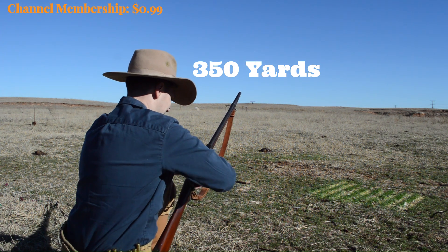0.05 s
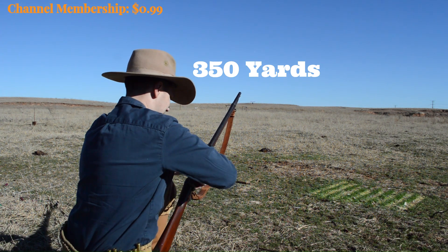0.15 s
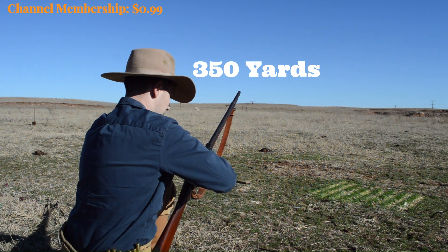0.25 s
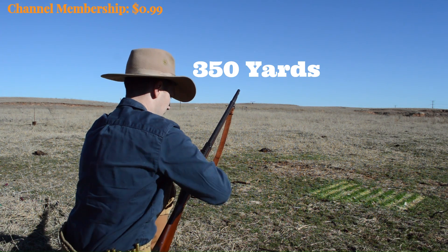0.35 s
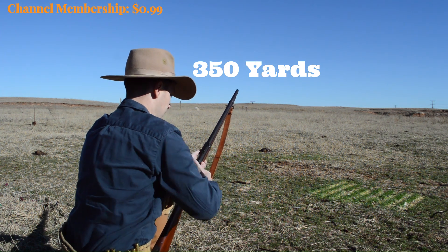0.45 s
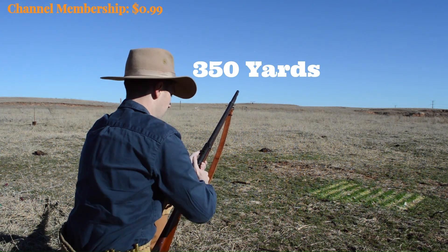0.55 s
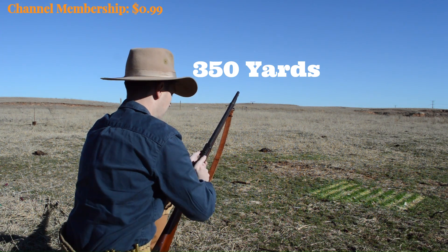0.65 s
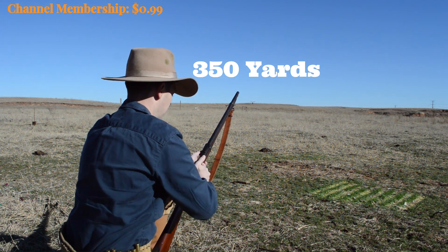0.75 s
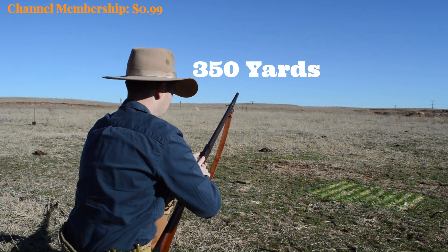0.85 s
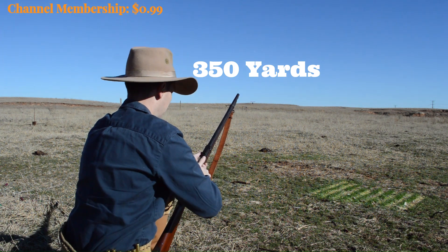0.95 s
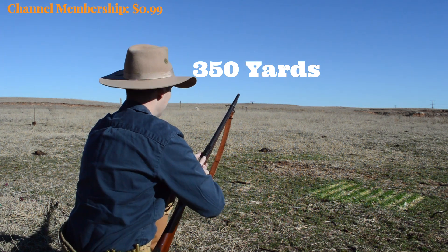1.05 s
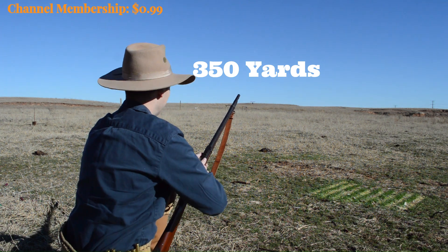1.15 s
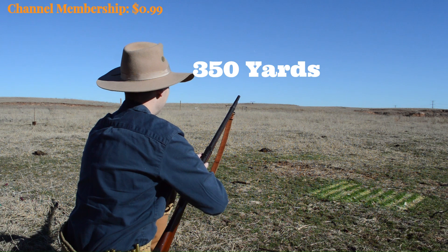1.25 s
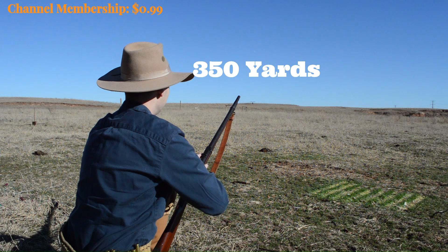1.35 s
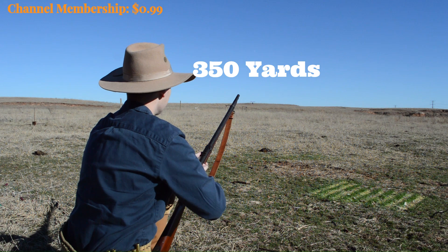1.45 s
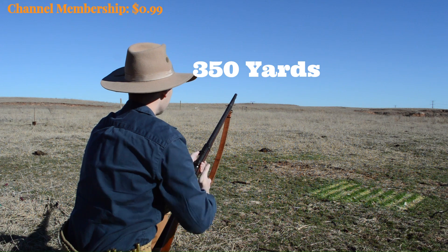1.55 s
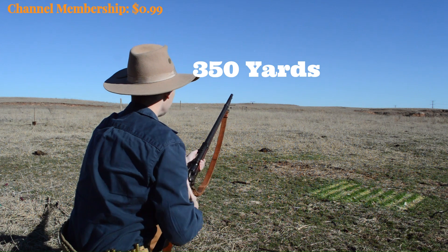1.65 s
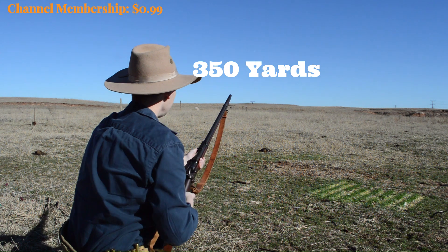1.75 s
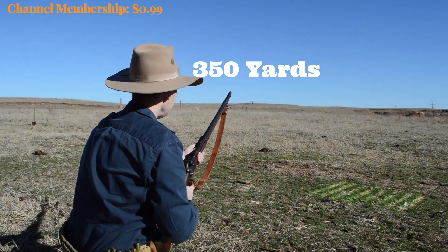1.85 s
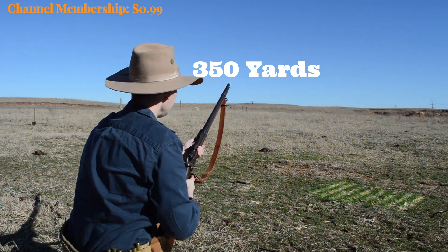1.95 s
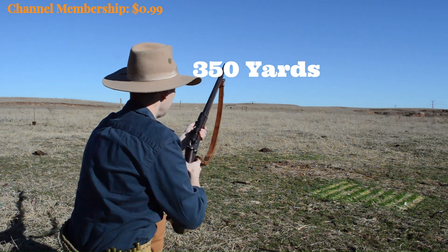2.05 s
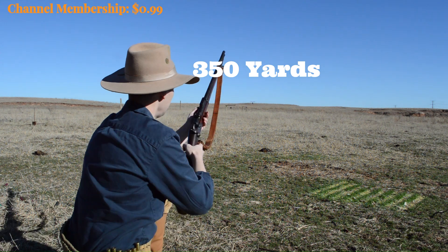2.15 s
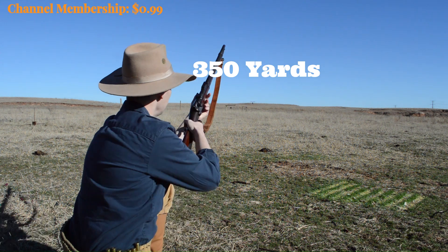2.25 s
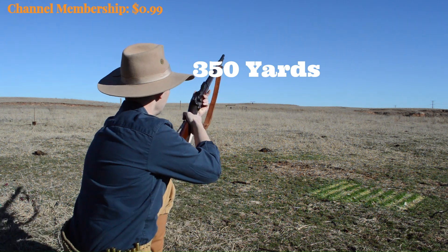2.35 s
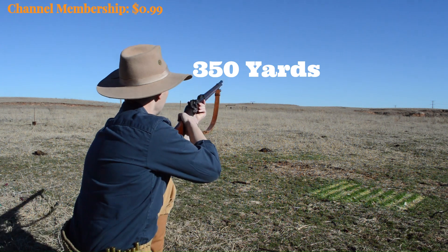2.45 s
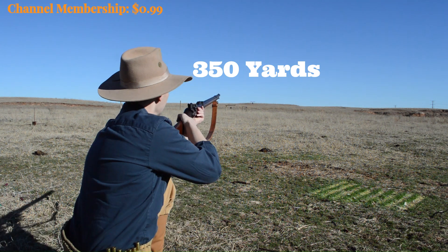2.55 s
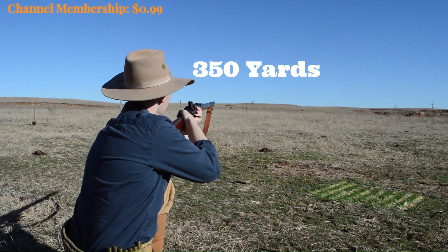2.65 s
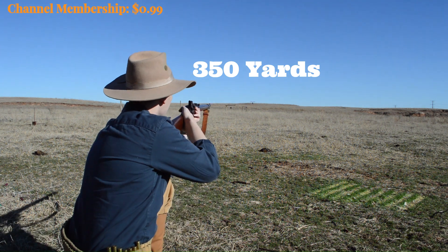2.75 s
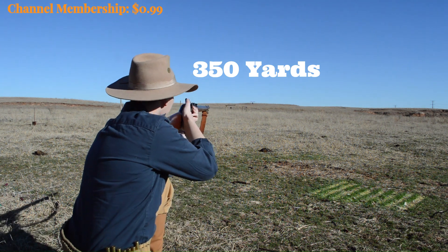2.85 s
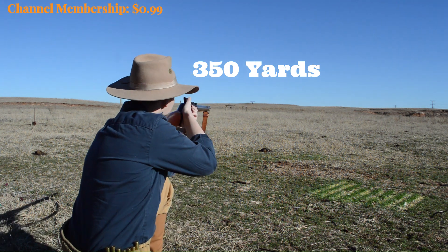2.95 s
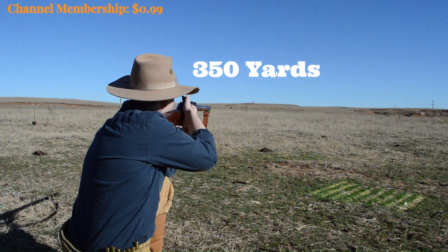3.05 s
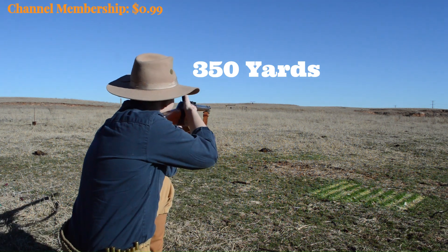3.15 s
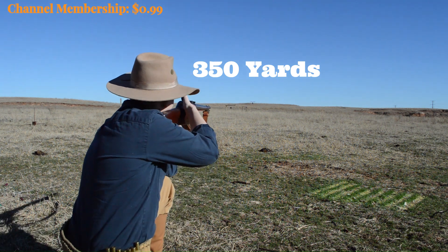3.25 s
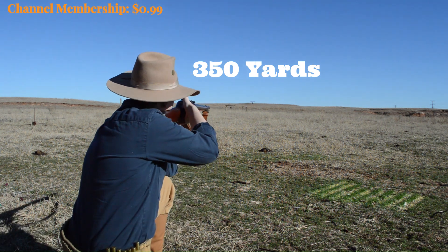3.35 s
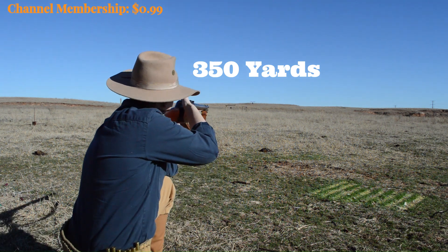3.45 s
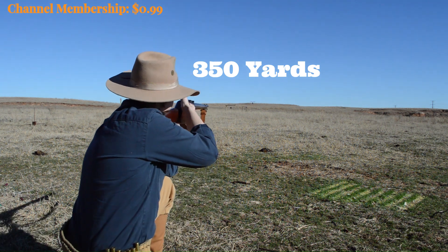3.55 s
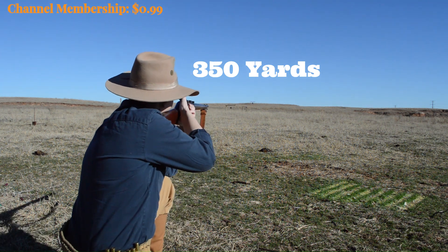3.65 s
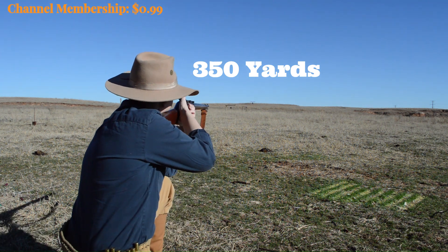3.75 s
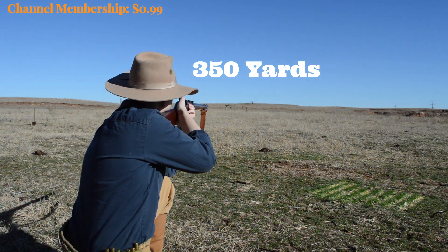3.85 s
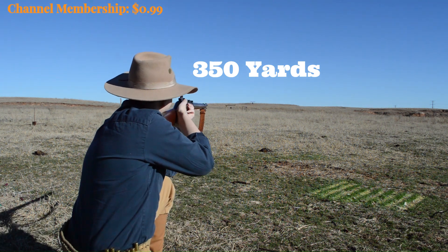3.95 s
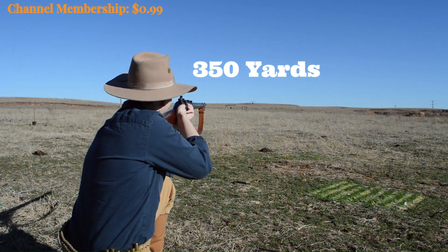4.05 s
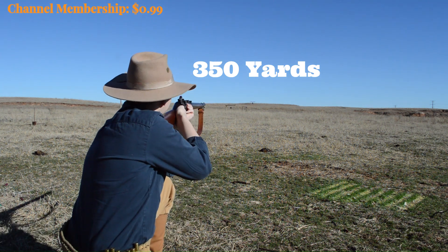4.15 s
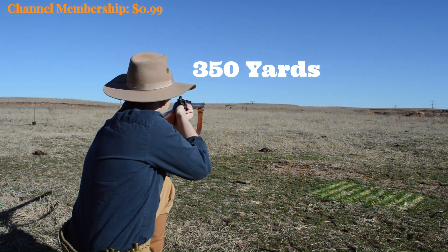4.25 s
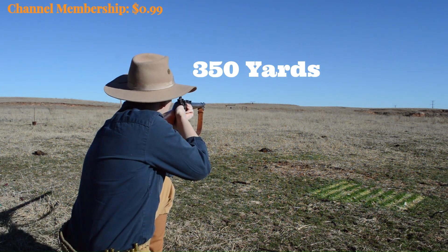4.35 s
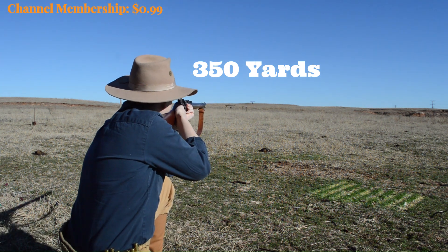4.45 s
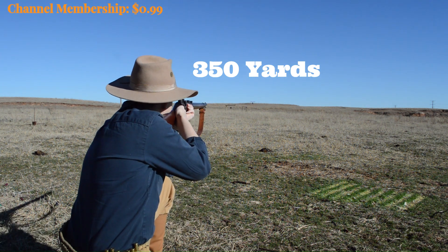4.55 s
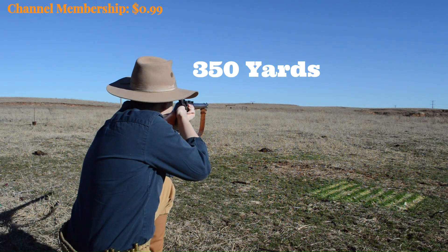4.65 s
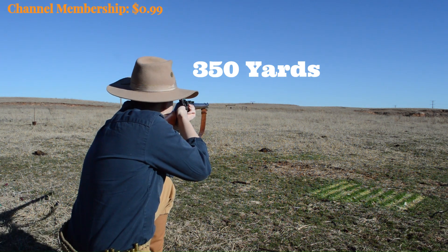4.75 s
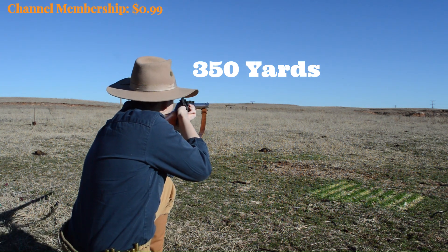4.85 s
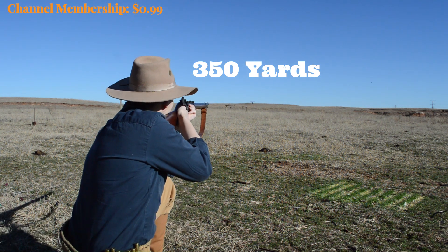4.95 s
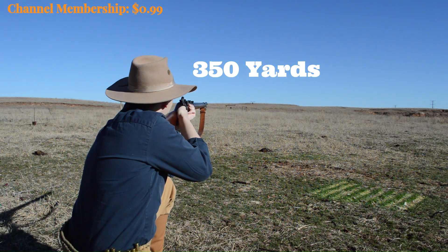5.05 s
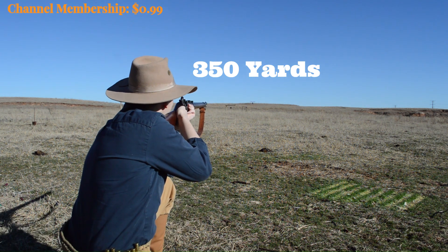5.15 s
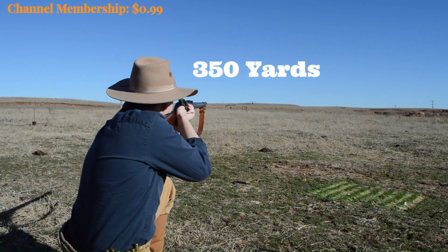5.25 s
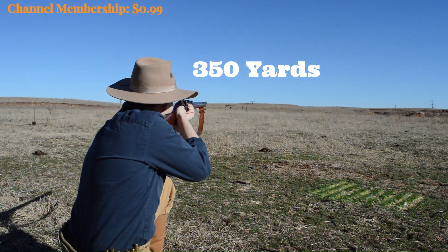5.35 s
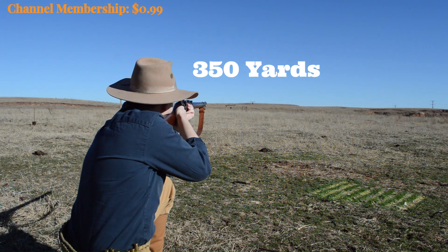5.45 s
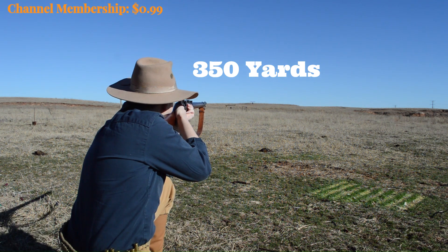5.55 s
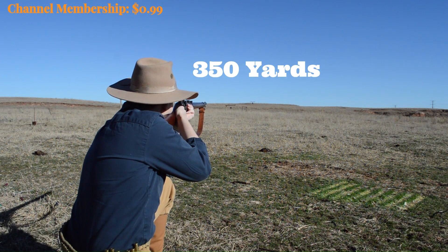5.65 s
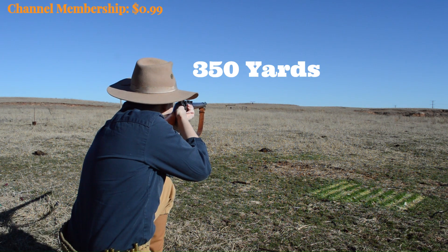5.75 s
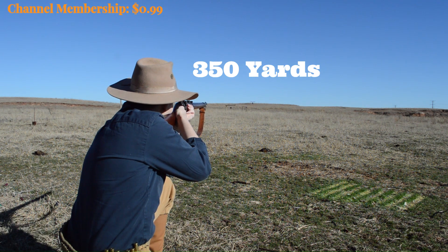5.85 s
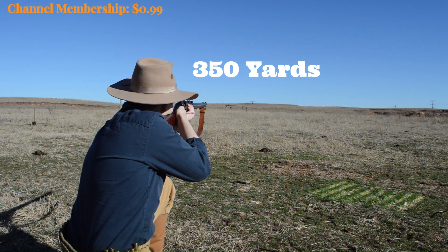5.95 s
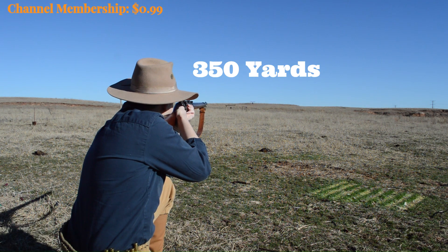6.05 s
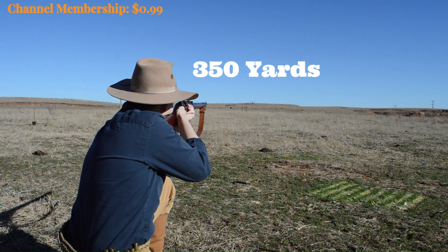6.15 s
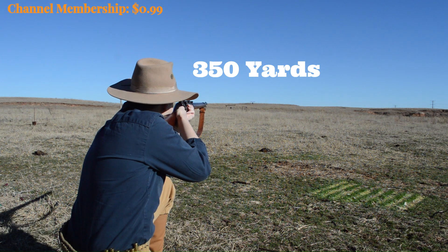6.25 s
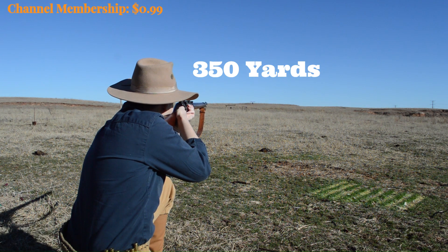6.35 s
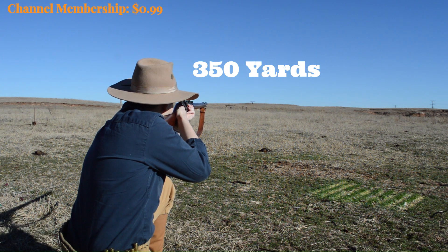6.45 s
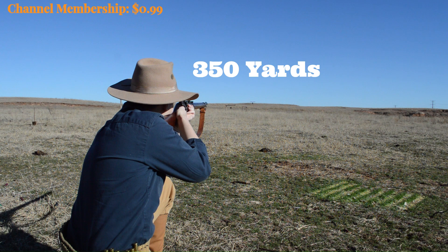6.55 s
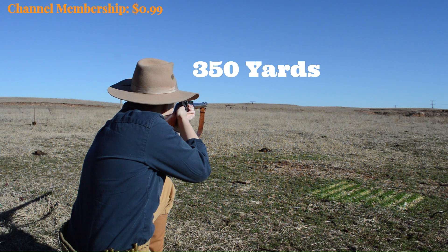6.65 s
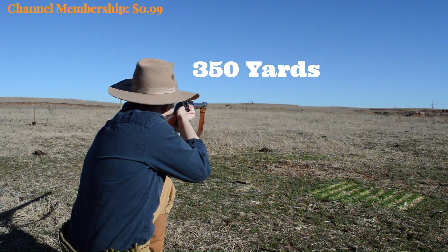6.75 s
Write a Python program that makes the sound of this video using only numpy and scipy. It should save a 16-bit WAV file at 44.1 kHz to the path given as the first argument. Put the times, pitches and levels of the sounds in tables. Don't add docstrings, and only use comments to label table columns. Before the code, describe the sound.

Outdoors in an open field, a shirt-mounted microphone catches everything dry and close over light low wind, faint mains hum and steady hiss. From 0 to 0.6 s there are soft cloth rustles, faint hollow metal strokes and a small tick at 0.45. Quiet until dull bumps near 1.2, then light strokes and ticks from 1.4 to 2.1. A hollow scrape leads into a loud bright steel ping at 2.2, with hard double taps at 2.35. From 2.41 to 2.62 cloth drags harshly across the microphone, crackling, thumping and humming unsteadily, then stops dead. Rustling fades, with a lone tap at 2.87 and a thump at 3.1. At 3.58 a very loud ringing metal snap dominates; the background briefly ducks. A stock knock with clacks follows at 3.78, clicks at 3.83, a bright double snap at 3.94 to 3.96. Afterward only slight rustles, tiny snaps and soft bumps until nearly 7 s.

```python
import sys
import numpy as np
from scipy import signal
from scipy.fft import rfft, irfft
from scipy.io import wavfile
from scipy.ndimage import uniform_filter1d

SR = 44100
rng = np.random.default_rng(int(sys.argv[2]) if len(sys.argv) > 2 else 0)


def field_ratio(decibels):
    return 10 ** (np.asarray(decibels, dtype=float) / 20)


def inscribe(sig):
    pcm = np.round(np.clip(np.atleast_2d(sig).T, -1, 1) * 32767)
    wavfile.write(sys.argv[1], SR, pcm.astype(np.int16))


N = 300321


def evened(x):
    return x / np.sqrt(np.mean(x ** 2) + 1e-20)


def peaked(x, db):
    return field_ratio(db) * x / abs(x).max()


def add(mix, s, sound):
    part = mix[round(s * SR):][:len(sound)]
    part += sound[:len(part)]


def curve(rows, column):
    rows = np.array(rows)
    return np.interp(np.arange(N) / SR, rows[:, 0], rows[:, column], left=-120, right=-120)


def lumps(length):
    return evened(uniform_filter1d(rng.standard_normal(N), length))


def noise(spectrum, band_hz, grain_db=0., grain_s=.004):
    hz = np.fft.rfftfreq(N, 1 / SR)
    f, db = np.transpose(spectrum)
    gain = field_ratio(np.interp(np.log(hz + 1), np.log(f + 1), db))
    grain = field_ratio(grain_db * lumps(max(int(grain_s * SR), 1)))
    z = rfft(evened(rng.standard_normal(N) * grain)) * gain
    inside = (hz > band_hz[0]) & (hz < band_hz[1])
    return irfft(z, N) / np.sqrt(2 * np.sum(gain[inside] ** 2) / N)


def rings(modes, t):
    out = np.zeros(len(t))
    for hz, width_hz, db in modes:
        decay = np.exp(-np.pi * width_hz * t)
        out += field_ratio(db) * np.sqrt(width_hz) * decay * np.sin(2 * np.pi * hz * t)
    return out


def struck(modes, contact_s, t):
    out = np.zeros(len(t))
    for hz, width_hz, db in modes:
        decay = np.exp(-np.pi * width_hz * t)
        out += field_ratio(db) * width_hz * decay * np.sin(2 * np.pi * (hz * t + rng.random()))
    return out * (1 - np.exp(-(t / contact_s) ** 2))


def chatter(t60, rise_s, t):
    hits = rng.standard_normal(len(t)) * (1 - np.exp(-t / rise_s)) * field_ratio(-60 * t / t60)
    hits[0] = 0.61
    return hits


def swells(rows, column=2):
    t, out = np.arange(N) / SR, np.zeros(N)
    ends_db = -11.5
    for row in rows:
        middle_s, length_s = row[:2]
        near = slice(max(int((middle_s - 2 * length_s) * SR), 0), int((middle_s + 2 * length_s) * SR))
        fall_db = ends_db * (2 * (t[near] - middle_s) / length_s) ** 2
        out[near] += field_ratio(sum(row[2:column + 1]) + fall_db) ** 2
    return out


# (time [s], level [dB])
EFFORT_CURVE = [(0, -59), (.27, -64), (1.45, -65), (1.62, -54), (1.88, -59.5), (2.2, -44), (2.33, -46),
                (2.396, -61), (2.63, -36), (2.87, -42.5), (2.96, -45.5), (3.14, -47), (3.17, -55.5),
                (3.6, -55), (3.95, -56.5), (4.13, -54.5), (4.16, -66), (6.81, -72)]


def follows(base_db, slope):
    return field_ratio(base_db + slope * (curve(EFFORT_CURVE, 1) + 57)) ** 2


def dragged(levels_db):
    bite_s, stop_s = 2.407, 2.621
    at = [bite_s - .002, bite_s, bite_s + 0.04, 2.557, stop_s - 0.022, stop_s, stop_s + 0.0033]
    return field_ratio(np.interp(np.arange(N) / SR, at, [-90, *levels_db, -90])) ** 2


# (frequency [Hz], density [dB per Hz])
PREAMP_COLOUR = [(18, -27), (30, -1), (250, 2.5), (780, -2), (3000, -1.5), (10000, -2), (15700, -2),
                 (16200, -24)]


def preamp():
    return field_ratio(-55) * noise(PREAMP_COLOUR, (200, 16000))


# (frequency [Hz], density [dB per Hz])
AIR_COLOUR = [(20, -16), (45, 0), (100, -8), (800, -11.5), (2000, -12.5), (6000, -14), (15700, -16),
              (16000, -38)]


def air():
    return field_ratio(-55) * noise(AIR_COLOUR, (200, 16000))


# (frequency [Hz], level [dB rms])
HUM_PARTIALS = [(59.5, -63.5), (119, -65.5), (178.5, -73.5)]


def hum():
    t, out = np.arange(N) / SR, np.zeros(N)
    for hz, db in HUM_PARTIALS:
        out += np.sqrt(2) * field_ratio(db) * np.sin(2 * np.pi * (hz * t + rng.random()))
    return out


# (frequency [Hz], density [dB per Hz])
GUST_COLOUR = [(25, -16), (50, -4), (90, 0.5), (160, -4), (300, -13.5), (600, -37)]
# (middle [s], length [s], level [dB])
BODY_BUMPS = [(1.178, 0.061, -47), (1.666, 0.1, -45), (1.793, .08, -47), (.33, .2, -50.5),
              (1.98, 0.17, -49), (2.14, 0.11, -46), (2.254, .07, -37), (2.38, 0.067, -35.5),
              (2.65, 0.089, -39), (2.72, 0.082, -33), (3.128, .05, -37), (3.58, 0.47, -52),
              (4.468, .06, -43.5), (5.85, 0.12, -49), (5.97, 0.16, -48), (6.2, 0.14, -45),
              (6.35, 0.21, -44.5), (6.06, .07, -49), (6.465, .05, -48.5)]


def wind():
    power = follows(-55.5, 0.48) + swells(BODY_BUMPS) + dragged([-33.5] * 5)
    return field_ratio(-3.0) * np.sqrt(power) * noise(GUST_COLOUR, (40, 250), grain_db=1.6, grain_s=.02)


# (frequency [Hz], density [dB per Hz])
FIBRE_COLOUR = [(710, -48), (1200, -4.5), (1890, -6.5), (4220, -5.5), (8530, -3), (11400, -6),
                (15500, -11.5), (16000, -33)]
BRUSH_COLOUR = [(710, -50), (1200, -3.5), (1890, -4), (3300, -5), (4800, -3), (9500, -7), (11800, -10.5),
                (16000, -15)]
RUB_COLOUR = [(120, -7), (250, 0), (420, 1), (700, -1), (1200, -4.5), (2500, -9), (5000, -28)]
# (middle [s], length [s], fibre hiss [dB], coarse rub over it [dB])
SHIRT_RUSTLES = [(.01, 0.19, -61, 11.5), (.36, 0.19, -55.5, -2), (.49, 0.36, -59.5, 3),
                 (1.195, 0.035, -60, 9.5), (1.585, 0.14, -56, 6), (1.91, .06, -59.5, 8),
                 (1.971, 0.1, -57.5, 8.5), (2.06, 0.078, -61, 7), (2.198, .05, -48, -9),
                 (2.23, 0.051, -51, 12), (2.38, 0.077, -64.5, 17.5), (2.64, 0.078, -49, 4),
                 (3.125, 0.043, -49.5, 13.5), (3.279, 0.19, -49.5, 3), (3.5, 0.11, -47.5, 0.5),
                 (3.6, 0.049, -65.5, 23), (3.8, 0.11, -64, 8), (3.93, 0.067, -51, -15),
                 (3.982, 0.14, -57, 8.5), (4.47, 0.4, -65.5, 5), (4.7, 0.32, -63, 3), (4.97, .15, -64, 1),
                 (2.88, 0.068, -41, -12)]
# (bite [dB], built [dB], crest [dB], sag [dB], stop [dB])
DRAG_FIBRE_LEVELS = (-36.5, -27, -24, -23.5, -34)
DRAG_RUB_LEVELS = (-36, -30, -27, -33, -28)


def cloth():
    brush_power = follows(-57, 1) + swells(SHIRT_RUSTLES)
    rub_power = follows(-56, 0.65) + swells(SHIRT_RUSTLES, column=3) + dragged(DRAG_RUB_LEVELS)
    fibre = noise(FIBRE_COLOUR, (4000, 14000), grain_db=0.5, grain_s=0.0024)
    rub = noise(RUB_COLOUR, (350, 1000), grain_db=2.5, grain_s=.004)
    brush = noise(BRUSH_COLOUR, (4000, 14000), grain_db=1.5, grain_s=.003)
    return np.sqrt(dragged(DRAG_FIBRE_LEVELS)) * fibre + np.sqrt(rub_power) * rub + np.sqrt(brush_power) * brush


# (time [s], frequency [Hz], level [dB])
DRAG_HUM = [
    (2.43, 200, -35),
    (2.47, 251.3, -28),
    (2.5, 235, -20),
    (2.525, 184, -14.5),
    (2.54, 99, -27),
    (2.575, 136.7, -23),
    (2.592, 241, -18),
    (2.617, 257, -17),
    (2.623, 265, -52),
]


def drag_hum():
    wobble, flutter = lumps(300), lumps(300)
    turn = 2 * np.pi * np.cumsum(curve(DRAG_HUM, 1) * (1 + 0.0633 * wobble)) / SR
    return field_ratio(curve(DRAG_HUM, 2) - 1 + 2.0 * flutter) * (np.sin(turn) + 0.19 * np.sin(2 * turn))


# (time [s], peak [dB], swing [Hz], t60 [s], first swing [+1 or -1])
CAPSULE_PUSHES = [(1.15, -43, 201, 0.027, 1), (1.189, -31.5, 109, 0.031, 1),
                  (2.228, -23.5, 68.6, 0.091, -1), (2.274, -19, 89.7, 0.018, -1),
                  (2.346, -28, 420, 0.019, 1), (2.423, -9, 205, 0.011, -1), (2.621, -13, 170, 0.0096, 1),
                  (2.714, -25, 110, 0.021, -1), (2.768, -33, 297, .013, -1), (2.93, -37, 110, .092, 1),
                  (3.103, -27, 250, 0.018, 1), (3.114, -17, 129, 0.036, 1), (3.584, -31, 200, 0.027, 1),
                  (4.002, -31.5, 145, 0.029, 1), (4.473, -50, 109, 0.063, 1), (5.419, -48, 400, .022, 1),
                  (5.903, -40.5, 250, 0.037, 1), (6.206, -38, 75, .057, 1)]


def pushes():
    out, t = np.zeros(N), np.arange(8192) / SR
    for s, db, hz, t60, sign in CAPSULE_PUSHES:
        rise_s = 0.00047 * 2 ** (-(db + 32) / 17)
        swing = np.sin(2 * np.pi * hz * t + 1.97) * (1 - np.exp(-t / rise_s)) * field_ratio(-60 * t / t60)
        add(out, s, sign * peaked(swing, db))
    return out


# (time [s], peak [dB])
BROAD_SNAPS = [(2.4105, -30), (2.6, -20), (2.417, -31), (2.4615, -6.5), (2.502, -12), (2.5408, -13),
               (2.5455, -14), (3.293, -28), (3.5658, -20), (1.188, -44), (3.1035, -14), (4.855, -37),
               (5.369, -39), (4.452, -38)]
# (frequency [Hz], width [Hz], level [dB])
SNAP_MODES = [(513, 320, -7), (2000, 2900, -1), (6000, 4000, -9)]


def snaps():
    out, t = np.zeros(N), np.arange(512) / SR
    for s, db in BROAD_SNAPS:
        snap = signal.fftconvolve(chatter(0.0046, 0.000067, t), rings(SNAP_MODES, t))
        add(out, s, peaked(snap, db))
    return out


# (frequency [Hz], width [Hz], level [dB])
HOLLOW_MODES = [(1250, 90, 0), (1450, 160, -2), (1750, 220, -6), (2640, 200, -9), (3250, 300, -11)]
# (middle [s], length [s], level [dB])
HAND_STROKES = [(.045, 0.029, -42.5), (.348, 0.074, -42.5), (.428, 0.052, -48), (.54, 0.098, -58),
                (1.527, 0.015, -45), (1.58, .11, -42), (1.74, .2, -54.5), (1.84, 0.033, -47.5),
                (1.903, 0.033, -46.5), (2.04, 0.11, -52), (2.108, .045, -40.5), (2.177, 0.087, -33),
                (2.265, 0.066, -35.5), (2.32, .04, -46)]


def slide():
    slips = rng.standard_normal(N) * field_ratio(2.7 * lumps(90))
    rung = signal.oaconvolve(slips, rings(HOLLOW_MODES, np.arange(2048) / SR))[:N]
    rung = signal.lfilter(*signal.butter(6, 1130, "high", fs=SR), rung)
    return np.sqrt(swells(HAND_STROKES)) * evened(rung)


# (time [s], peak [dB], ring [Hz], t60 [s])
SLING_TICKS = [(0.4453, -25.5, 1820, 0.0045), (1.432, -39.5, 2080, .012), (1.7706, -33, 1820, 0.0088),
               (1.7837, -32, 2080, .012), (1.949, -27.5, 2790, 0.0093), (1.9495, -39, 6300, .008),
               (2.0494, -37.5, 2000, .012), (3.604, -38, 2090, 0.033), (3.8236, -38, 1490, .008),
               (3.964, -32, 770, 0.036), (3.9875, -42, 930, 0.011), (4.0135, -42, 2000, .004)]


def sling():
    out, t = np.zeros(N), np.arange(2048) / SR
    for s, db, hz, t60 in SLING_TICKS:
        tick = np.sin(2 * np.pi * hz * t) * (1 - np.exp(-t / 0.00033)) * field_ratio(-60 * t / t60)
        add(out, s, peaked(tick, db))
    return out


# (frequency [Hz], level [dB], t60 [s])
STOCK_RINGS = [(156, -28, 0.092), (335, -22, 0.051), (727, -18, 0.057), (900, -17.5, 0.013)]


def stock():
    out, t = np.zeros(N), np.arange(8192) / SR
    knock = sum(field_ratio(db - 60 * t / t60) * np.sin(2 * np.pi * hz * t) for hz, db, t60 in STOCK_RINGS)
    add(out, 3.7752, knock)
    return out


# (time [s], peak [dB], contact [s])
HAMMER_BLOW = (3.5819, 6.1, 0.00091)
# (frequency [Hz], width [Hz], level [dB])
HAMMER_RINGS = [(710, 160, -9.5), (1102, 230, -1), (1630, 260, -7), (2190, 150, 1.5), (2790, 170, -0.5),
                (4450, 360, -4), (5580, 200, -5.5), (6070, 330, -3.5), (7100, 300, -5), (8100, 330, -9.5),
                (9500, 240, -12), (10600, 700, -11.5), (12630, 700, -17), (15300, 900, -17)]


def hammer():
    out, t = np.zeros(N), np.arange(2048) / SR
    s, db, contact_s = HAMMER_BLOW
    add(out, s, peaked(struck(HAMMER_RINGS, contact_s, t), db))
    return out


# (frequency [Hz], width [Hz], level [dB])
LOCK_RINGS = [(2800, 550, 1.5), (3860, 720, -4), (5860, 940, 4), (7600, 470, -2.5), (8600, 1100, -11),
              (12500, 2500, -20)]
BODY_RINGS = [(1230, 460, 5), (1740, 160, 5), (2280, 490, -24)]
# (time [s], peak [dB], bright centre [Hz], body under it [dB], chatter t60 [s])
LOCK_PINGS = [
    (2.1944, -2, 7600, -39, 0.0044),
    (2.198, -14.5, 7900, -17, 0.0097),
    (3.775, -19, 2800, 0, 0.016),
    (3.8338, -20, 6600, -9, 0.013),
    (3.835, -30, 3200, 1, .015),
    (3.9407, -10.5, 6840, -38, 0.0041),
    (3.9412, -22, 3300, -32, .0096),
    (3.9608, -20, 6410, -14, .0095),
    (3.961, -23.5, 3030, -12, 0.014),
]
LOCK_CLACKS = [
    (2.1946, -16, 3200, -10, .0076),
    (2.1981, -11.5, 3320, -20, 0.016),
    (2.3914, -26, 4400, -13, 0.0086),
    (3.7755, -15, 6570, -6.5, 0.0066),
    (3.7834, -18, 7140, -17, 0.0069),
]
LOCK_TAPS = [
    (.3083, -29, 5500, -20, .003),
    (1.9689, -32.5, 3000, -16, .0071),
    (2.3429, -11.5, 5230, -6.5, .0015),
    (2.352, -26, 8000, -20, .0015),
    (2.3546, -14.5, 4950, -3, 0.002),
    (2.8661, -16, 6300, -11, 0.006),
    (3.589, -15, 2600, 5.5, 0.0082),
]


def lock():
    out, t = np.zeros(N), np.arange(2048) / SR
    for clicks, octaves in ((LOCK_PINGS, 0.29), (LOCK_CLACKS, 0.54), (LOCK_TAPS, 0.61)):
        for s, db, centre_hz, body_db, t60 in clicks:
            near = [(centre_hz, 0.16 * centre_hz * octaves, 3)]
            for hz, width_hz, level_db in LOCK_RINGS:
                away = np.log2(hz / centre_hz) / octaves
                near.append((hz, width_hz, level_db - 6 * away ** 2))
            dull = signal.butter(2, min(1.73 * centre_hz, 15000), fs=SR)
            ring = signal.lfilter(*dull, rings(near, t))
            add(out, s, peaked(signal.fftconvolve(chatter(t60, 0.00035, t), ring), db))
            add(out, s, peaked(struck(BODY_RINGS, 0.00053, t), db + body_db))
    return out


def steel():
    rifle = sling() + stock() + hammer() + lock()
    return signal.lfilter(*signal.butter(2, 150, "high", fs=SR), rifle)


def scene():
    field = air() + hum() + wind()
    shirt = cloth() + drag_hum() + pushes() + snaps()
    mono = field + shirt + slide() + steel()
    return mono + np.array([preamp() for _ in range(2)])


def band_limit(x):
    return signal.sosfilt(signal.butter(12, 16790, fs=SR, output="sos"), x)


def record(dry):
    ceiling, edge_hz = .93, 15900
    peak_db = 20 * np.log10(abs(dry).max(0) + 1e-9)
    fall_db = np.arange(N) * 66.0 / SR
    held_peak_db = np.maximum.accumulate(peak_db + fall_db) - fall_db
    over_db = np.maximum(held_peak_db + 6.0, 0)
    dip_db = signal.lfilter([.004], [1, -.996], over_db)
    limited = np.clip(dry / field_ratio(0.64 * dip_db), -ceiling, ceiling)
    edge = signal.firwin(301, edge_hz, window=("kaiser", 7), fs=SR)
    mix = signal.oaconvolve(limited, edge[None], "same")
    return band_limit(mix)


dry = scene()
out = record(dry)
inscribe(out)
```